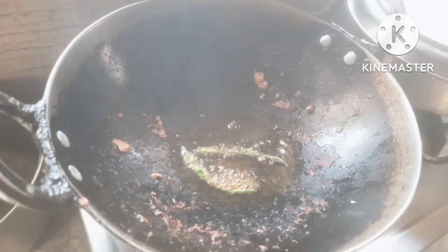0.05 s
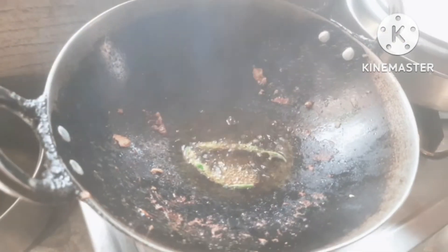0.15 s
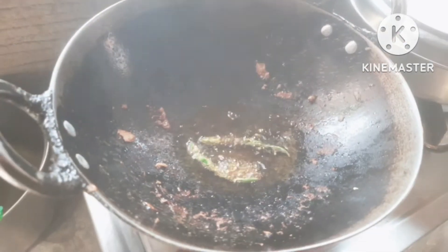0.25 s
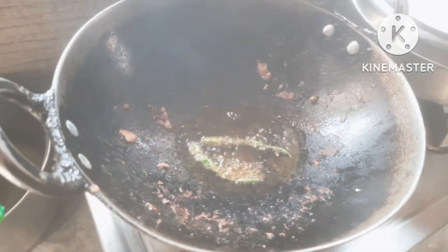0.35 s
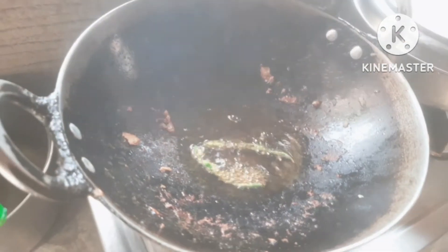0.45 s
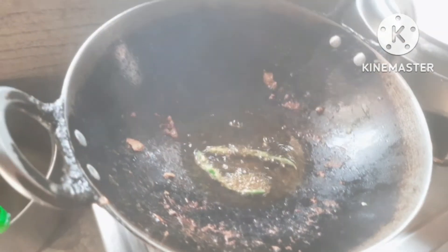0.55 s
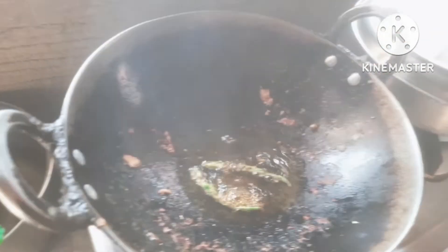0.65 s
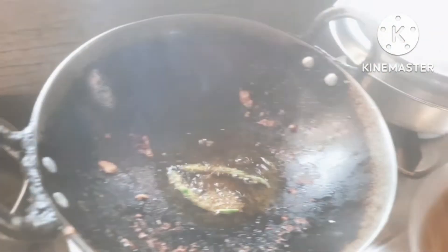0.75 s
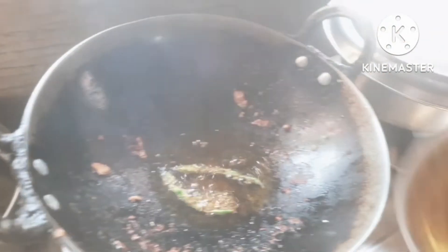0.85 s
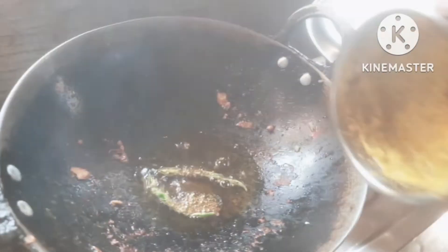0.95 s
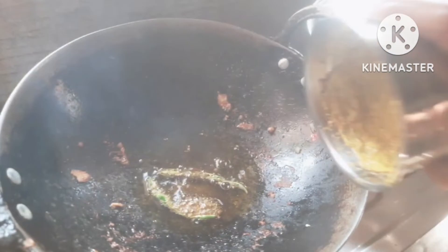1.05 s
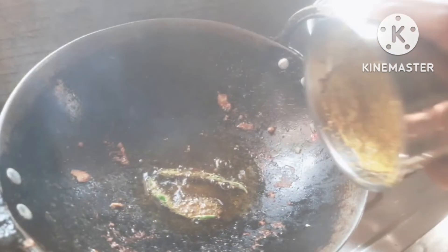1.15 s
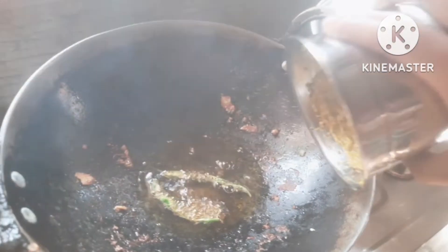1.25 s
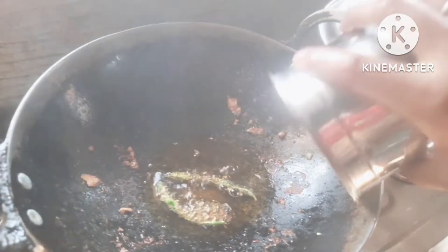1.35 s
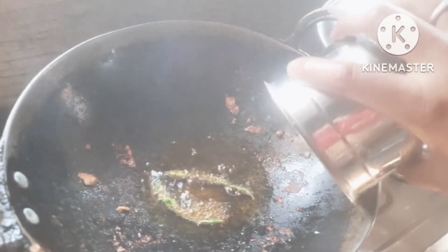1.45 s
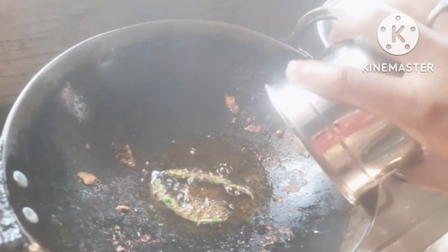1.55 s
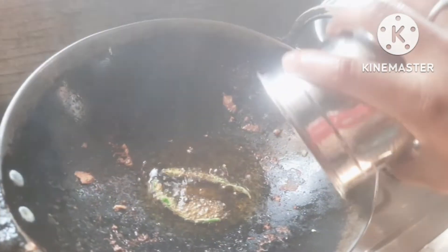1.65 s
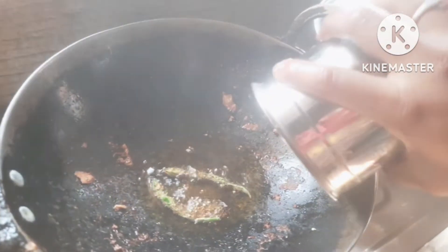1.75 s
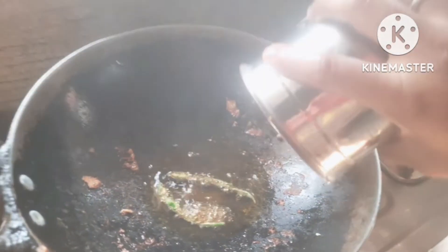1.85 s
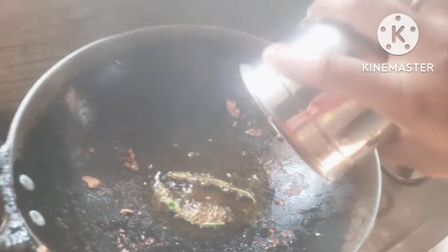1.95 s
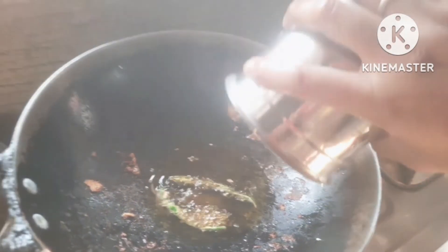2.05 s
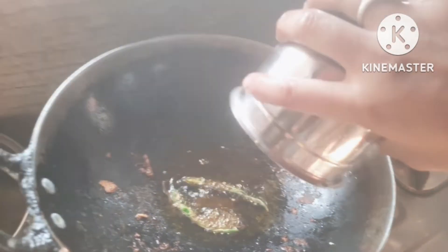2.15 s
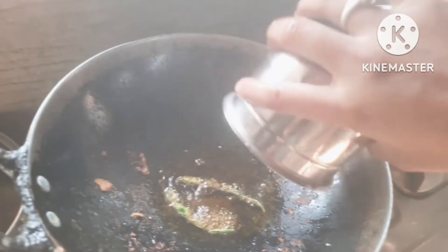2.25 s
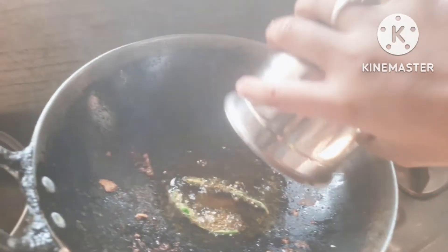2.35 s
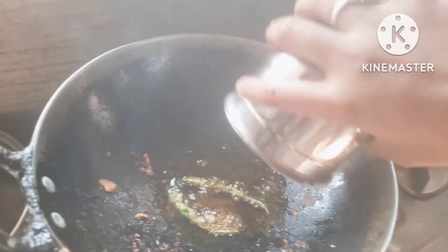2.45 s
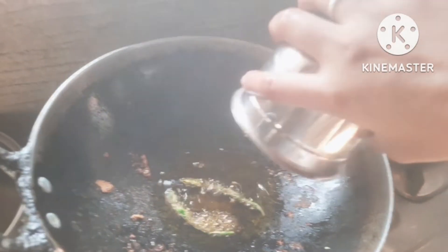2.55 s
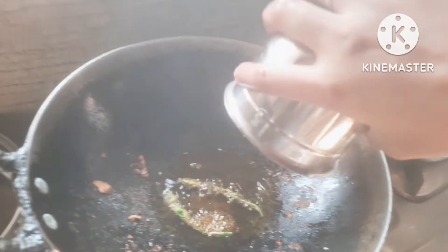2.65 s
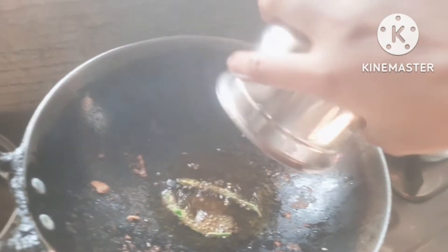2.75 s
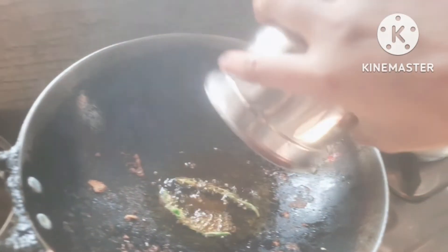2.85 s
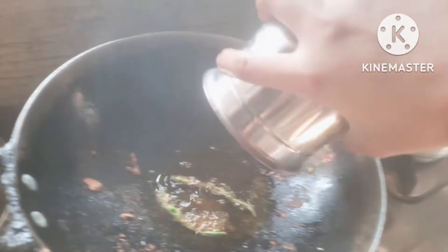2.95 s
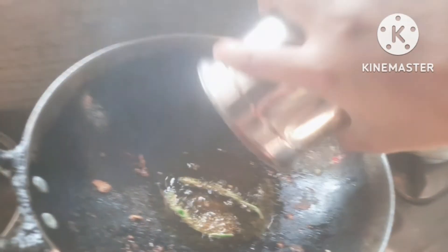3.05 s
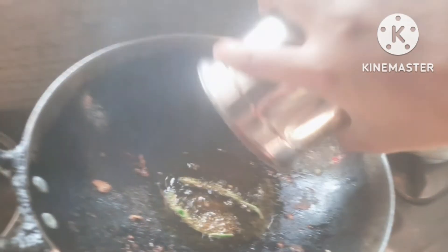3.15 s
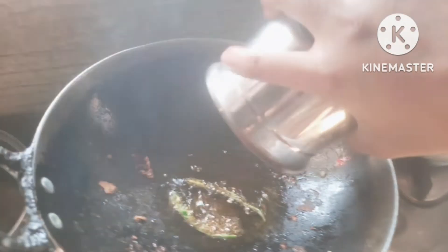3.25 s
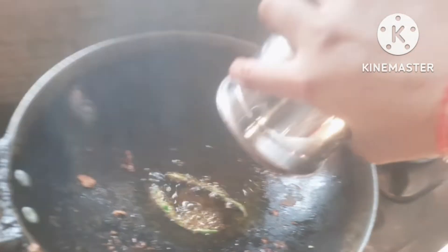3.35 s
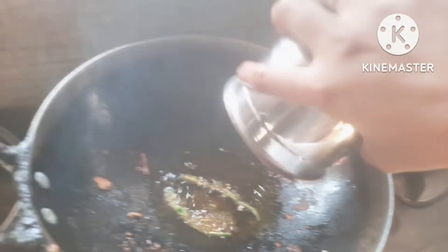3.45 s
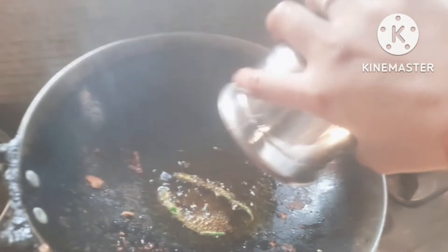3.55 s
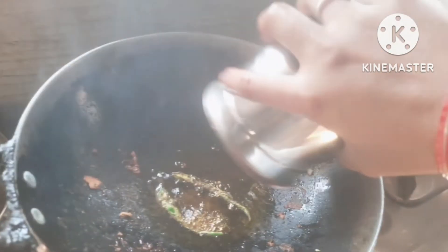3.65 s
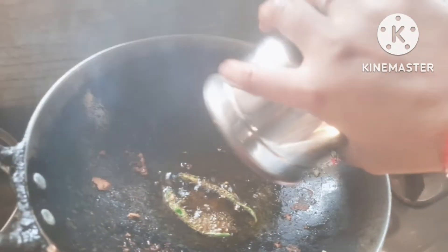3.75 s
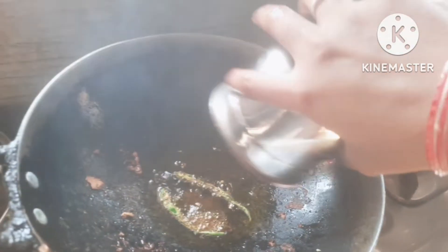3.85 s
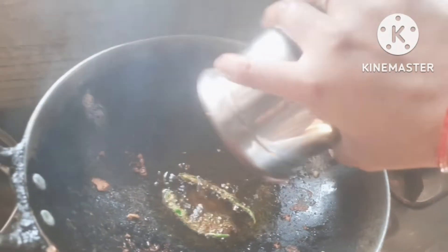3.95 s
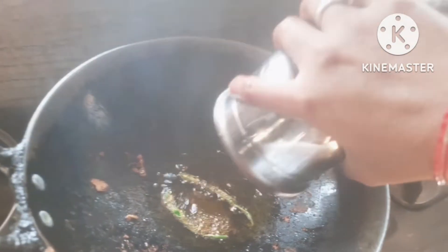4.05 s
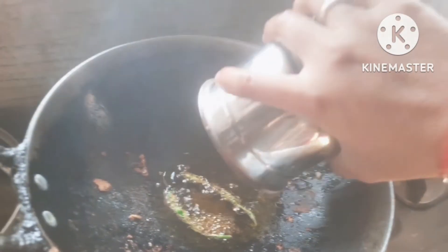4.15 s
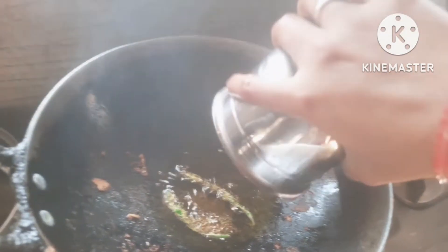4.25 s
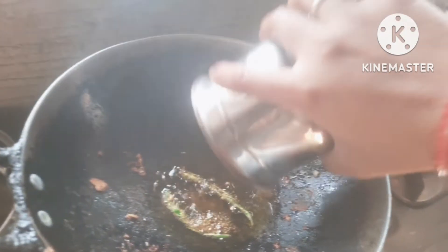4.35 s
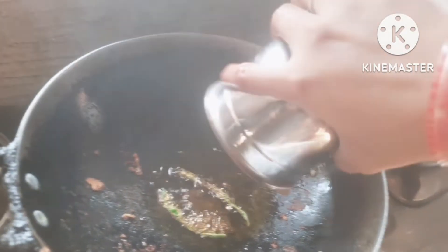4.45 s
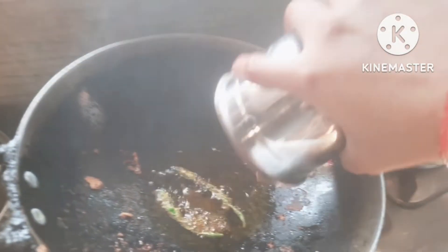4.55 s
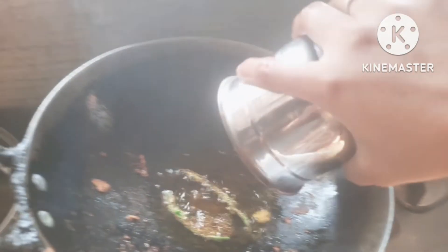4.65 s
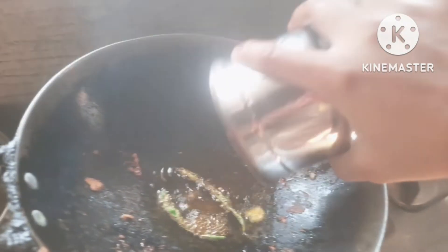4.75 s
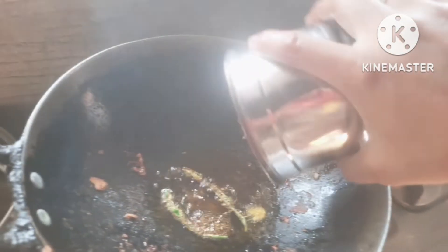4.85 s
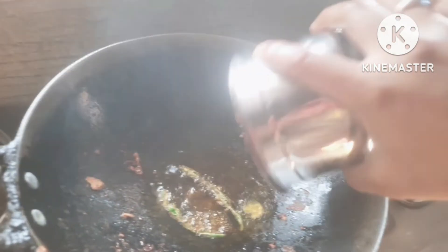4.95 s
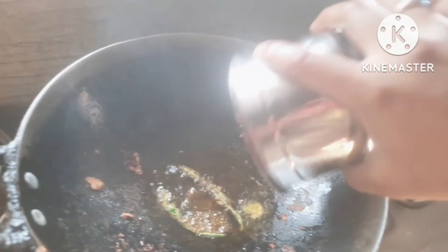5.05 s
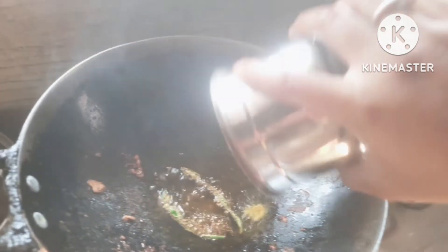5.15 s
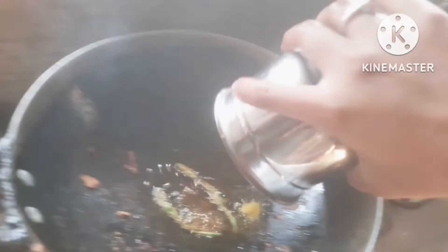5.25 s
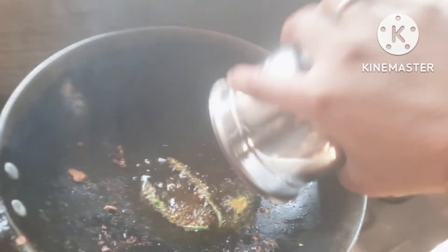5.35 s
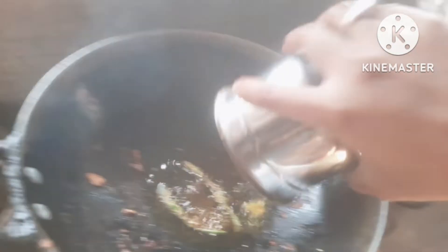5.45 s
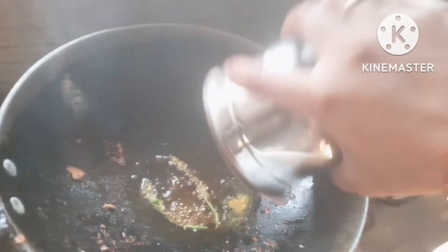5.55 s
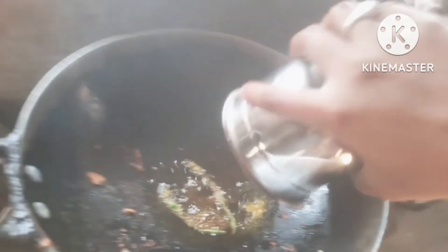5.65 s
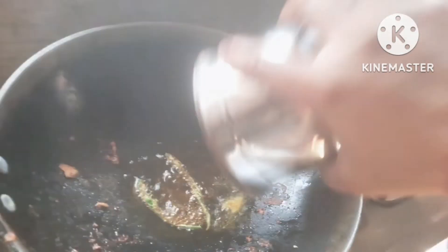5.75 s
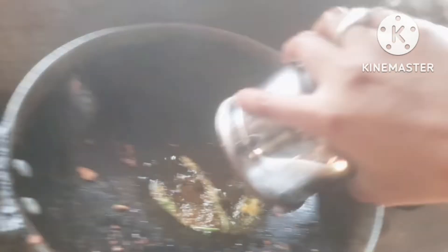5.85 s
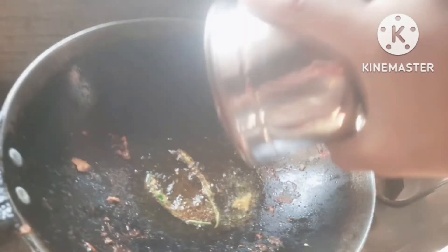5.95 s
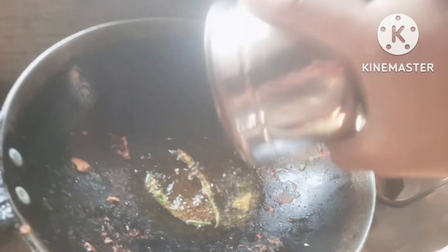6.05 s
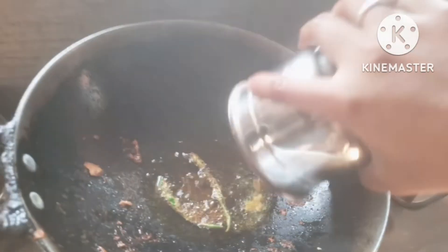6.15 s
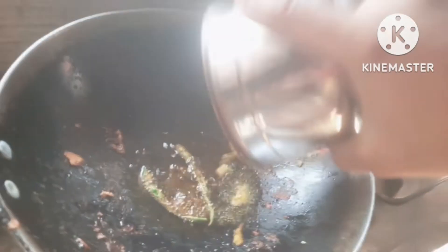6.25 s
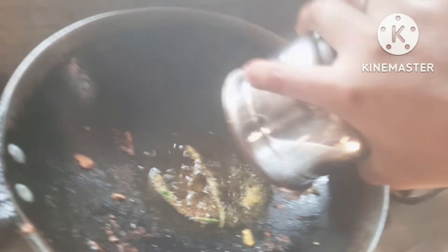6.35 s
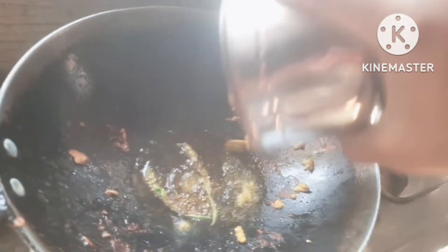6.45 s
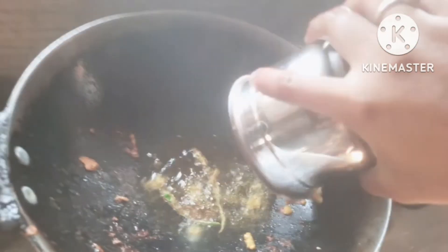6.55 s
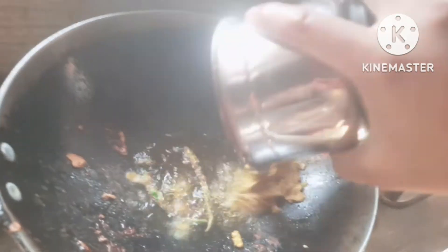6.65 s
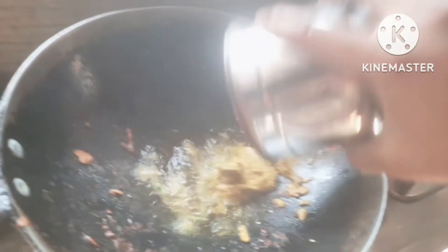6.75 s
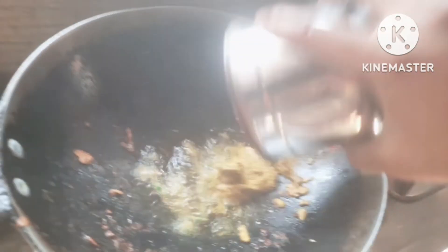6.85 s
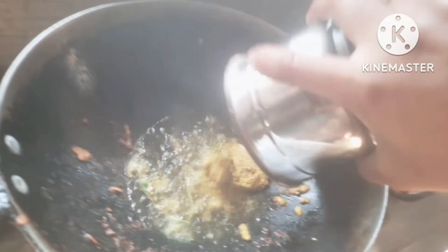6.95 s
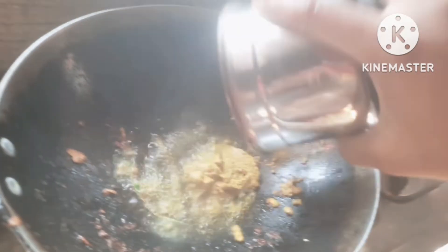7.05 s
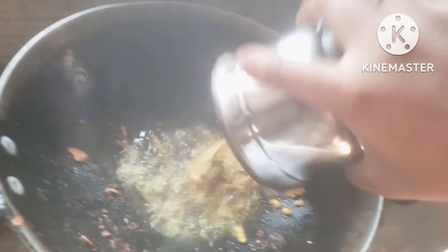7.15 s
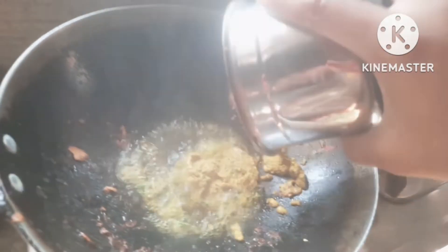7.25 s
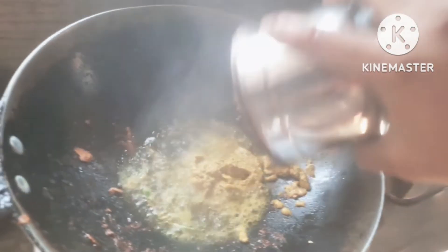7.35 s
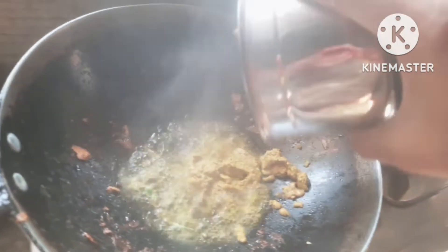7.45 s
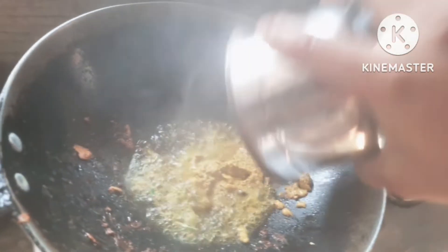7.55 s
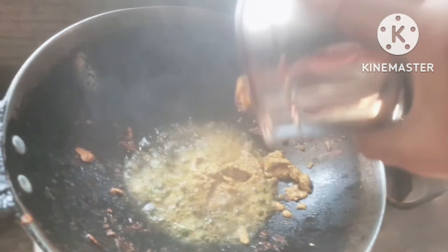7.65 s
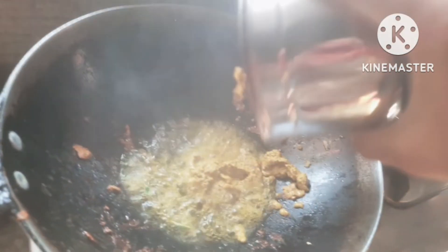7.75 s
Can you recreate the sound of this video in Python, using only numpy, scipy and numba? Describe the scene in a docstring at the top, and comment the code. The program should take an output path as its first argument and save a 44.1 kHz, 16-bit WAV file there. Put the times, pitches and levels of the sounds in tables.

```python
"""In a kitchen, close above the stove, chillies fizz quietly in hot oil in a wok: coloured hiss and tiny bursts.
A hand taps a steel tumbler (soft pressure pulses) and glass bangles clink (fading sines and ticks).
Then wet spice paste drops in: the oil spits (short ringing bubbles, oily snaps), crackles and swells to a
dense roar of steam bubbles. The phone is jolted once; wooden knocks are modes with noisy tails.
Narrow bands of noise make the faint rumble, the low air and a hollow drone behind it all."""
import sys
import numpy as np
from scipy import signal
from scipy.fft import rfft, irfft
from scipy.io import wavfile
from scipy.ndimage import uniform_filter1d
from numba import njit

SR = 44100
rng = np.random.default_rng(int(sys.argv[2]) if len(sys.argv) > 2 else 0)


def unload_audio(sound):
    """Save the sound as a 16-bit wav file, at the path given as the first command line argument."""
    columns = np.transpose(np.atleast_2d(sound))
    # keep every value between -1 and 1, then stretch to whole-number steps
    steps = np.round(np.clip(columns, -1, 1) * 32767)
    wavfile.write(sys.argv[1], SR, steps.astype(np.int16))


N = 343980
TIME = np.arange(N) / SR

# frying bed, a lump lands, then the bulk of the paste: t/s, middling bubbles level/dB, large level/dB, tiny level/dB
FRYING_LEVELS = [(0, -47.5, -55, -52.5), (1.2, -49.5, -56.5, -56.5), (1.9, -52.5, -56, -59.5),
                 (2.8, -47.5, -55.5, -56.5), (4.57, -48.5, -56.5, -55), (4.61, -31, -47, -31.5),
                 (4.8, -34, -45.5, -31), (5.5, -27, -44, -28.5), (6.2, -27, -42.5, -30),
                 (6.35, -23, -37, -28), (6.7, -22.5, -33, -22), (7.1, -23, -31.5, -26.5),
                 (7.8, -23.5, -31.5, -28.5)]
# colour of wok and microphone: f/Hz, relative level per Hz/dB
OIL_COLOUR = [(88, -49), (150, -24), (333, -27), (500, -15.5), (683, -15), (1110, -22), (1350, -18.5),
              (1770, -20), (3600, -10), (4600, 0), (5900, 2.5), (7170, 6), (7900, 4.5), (9410, -23.5),
              (10600, -23), (12800, -14.5), (15600, -18.5)]
LARGE_HZ, TINY_HZ = 4000, 9400  # large bubbles sound below the first, tiny ones above the second
# the bowl of the wok favours one band; its level at 0 dB of middling bubbles, and dB per dB of them
WOK_HZ, WOK_WIDTH_HZ = 2040, 770
WOK_DB, WOK_FOLLOWS = -30, 0.67
# crackle over hiss when large bubbles match middling ones (dB, before each band's trim);
# it gains as the large ones fall behind (dB per dB)
CRACKLE_DB, CRACKLE_GAIN = -10.5, 0.76

# single loud spits: t/s, level/dB, f/Hz
SPIT_EVENTS = [(0.1884, -19.5, 6960), (0.9433, -27, 7730), (1.538, -26, 4470), (2.021, -25, 6800),
               (2.2475, -26, 6010), (2.4255, -20.5, 4400), (3.1316, -23, 6850), (3.4241, -22, 5100),
               (3.4666, -11, 4740), (4.182, -19.5, 6660), (4.605, -13, 6540), (4.6266, -3, 6910),
               (4.653, -16, 6960), (4.6756, -8.5, 5360), (4.715, -4.5, 7600), (4.7789, -7, 7470),
               (4.8074, -13, 6980), (4.8543, -15, 6400), (4.8741, -5.5, 6500), (4.9235, -11, 7760),
               (4.9614, -9, 6500), (5.0325, -5, 7200), (5.0625, -9, 7000), (5.0927, -4.5, 7550),
               (5.1215, -7.5, 7260), (5.1513, -6, 6700), (5.2285, -7.5, 6520), (5.272, -3.5, 6100),
               (5.2993, -9, 7100), (5.326, -9, 5360), (5.376, -16, 4690), (5.3889, -11, 7300),
               (5.4073, -7, 7410), (5.4235, -5, 5500), (5.4601, -2, 7520), (5.4791, -1, 6760),
               (5.5282, -3.5, 5990), (5.5492, -2, 4940), (5.582, -3, 7000), (5.6177, -3.5, 7360),
               (5.6732, -5, 6260), (5.701, -6.5, 5200), (5.7335, -4, 6830), (5.7761, -3, 7280),
               (5.781, -4.5, 4030), (5.815, -4, 6470), (5.8717, -1, 6420), (5.9268, -3, 7050),
               (5.9647, -3.5, 5120), (5.9992, -1, 5740), (6.0863, -7, 7410), (6.1318, -2, 5560),
               (6.1567, 0, 7520), (6.1906, -7, 6360), (6.3623, -4.5, 4700), (6.8841, -3, 4540),
               (6.9424, -5, 4740), (7.1523, -9, 3520)]
# deeper bubbles: t/s, level/dB, f/Hz
PLOP_EVENTS = [(2.8877, -28.5, 1410), (4.383, -36.5, 615)]
# small spits get deeper as large bubbles catch up: large over middling level/dB, share of the pitch (ratio)
POP_SINKING = [(-16, 1), (-9, .72)]
SPIT_CYCLES, PLOP_CYCLES = 13, 12  # cycles until 60 dB down
SWELL_SHARE = 0.4  # the part subtracted for the swell fades in this share of the time
SNAP_DB, SNAP_SCATTER_DB = -6, 2  # re the spit
SPUTTER_DB, SPUTTER_S = (-11, -14, -17), 0.005  # three after-bubbles re the spit, longest wait
# small spits at random: level over middling bubbles, its spread, pitch before sinking
POPS_FROM_S, POP_DB, POP_SPREAD_DB, POP_HZ = 4.6, 5.5, 2, (4350, 7900)

# bangle clinks: t/s, first bangle level/dB, second re first level/dB, third re first level/dB
CLINK_EVENTS = [(0.7587, -33.5, -3, -13), (1.9809, -38.5, -1, -10), (2.096, -38, -4, -9),
                (2.231, -36, -6, -17), (2.2484, -39, -9, -14), (2.4468, -40, -13, -18),
                (2.5247, -33, -14, -19), (2.582, -28, -4, -13), (2.7214, -24, -8, -21),
                (2.813, -32, -7, -17), (2.85, -22, -7, -19), (2.9617, -30.5, -11, -19),
                (3.1745, -28.5, -3, -17), (3.229, -31, -4, -17), (3.3797, -39, -4, -15),
                (3.3874, -30, -10, -15), (3.487, -39, -14, -12), (3.5409, -32, -12, -17),
                (3.683, -28, -9, -18), (3.826, -28.5, -6, -8.5), (3.8394, -25.5, 1, -13),
                (3.8574, -28, -9, -15), (3.9715, -27.5, -4, -9.5), (3.989, -25, -4, -21),
                (4.0125, -36, -4, -16), (4.0736, -40, -8, -17), (4.1081, -32, -8, -16),
                (4.1502, -23.5, -9, -29), (4.2243, -29.5, -3, -15), (4.2605, -19, -10, -19),
                (4.274, -24, -2, -20), (4.3196, -21, -10, -28), (4.4071, -22, -4, -18),
                (4.4478, -26, -2, -16), (4.4717, -22.5, -9, -18), (4.5467, -42, 5, -12),
                (4.5791, -15.5, -16, -26), (5.7958, -15, -2, -16), (6.297, -18, -2, -15),
                (6.5677, -16, -7, -20)]
# modes of the three bangles, one list each: f/Hz, level/dB, t60/s
BANGLE_MODES = [
    [(14350, -3, 0.047), (14000, -28, 0.04), (4800, -22, 0.08), (4570, -30, 0.06), (12400, -41, 0.093)],
    [(15460, -6, 0.036), (15400, -10, 0.07), (15300, -1.5, 0.064), (15300, -15, .06), (5420, -13, 0.063)],
    [(9120, -8, 0.11), (8950, -6, 0.12), (10260, -3, 0.031), (10030, -5, 0.1), (10750, -1.5, 0.029)],
]
JINGLE_S, JINGLE_DB = (1.95, 4.56), -45  # faint random clinks while the hand taps: span, middle level

# dull thuds of the hand on the tumbler: t/s, level/dB
THUD_EVENTS = [(0.2114, -35), (1.2233, -38), (1.8146, -34), (1.995, -36), (2.487, -38), (2.695, -37),
               (2.8808, -35.5), (3.0586, -40.5), (3.232, -34.5), (3.4733, -30), (4.017, -32.5),
               (4.1996, -34), (4.4087, -35.5), (4.7166, -42), (5.1058, -36), (5.3727, -28), (5.584, -30.5),
               (5.6839, -34.5), (6.0285, -37), (6.4575, -35), (6.5957, -37), (6.645, -33.5), (6.821, -34.5),
               (6.996, -33.5), (7.165, -36), (7.3433, -36)]
# returns from floor and wall: delay t/s, level re the blow/dB
THUD_ECHOES = [(0.013, -6), (0.019, -7)]
BUMP_S, BUMP_DB, JOLT_S = 5.312, -14.5, 0.00014  # jolt of the phone: time, level, bell width
CRACK_DB = -3  # the case of the phone cracks

# wood set down: t/s, reference level/dB
KNOCK_EVENTS = [(1.4788, -31), (1.506, -25.5), (1.526, -31.5)]
# modes of the wood: f/Hz, level/dB, t60/s
WOOD_MODES = [(198, -7, 1.07), (366, -1.5, 0.55), (454, -0.5, 0.19), (617, 0, 0.15), (680, -12, 0.19),
              (914, 1, 0.095), (1200, 1, 0.25), (1370, 4, 0.11), (1590, -6, .1), (1825, -8, 0.087),
              (1990, -7, .1), (2270, -2, 0.04)]
SCUFF_S, SCUFF_DB, SCUFF_RISE_S, SCUFF_FALL_S = 0.139, -46.5, 0.028, 0.13  # something drags briefly

# the hollow drone comes and goes: t/s, length t/s, level/dB, pitch at the start f/Hz
DRONE_EVENTS = [(0.361, 0.78, -60, 680), (1.85, 0.24, -55, 649), (4.624, 0.057, -54, 622)]
DRONE_HZ, DRONE_DB, DRONE_FOLLOWS = 596, -32, 0.64  # level at 0 dB of large bubbles, dB per dB of them
DRONE_RISE_S, DRONE_FALL_S, DRONE_SETTLE_S, DRONE_WAVER_HZ = 0.025, 0.2, 0.4, 6
RUMBLE_DB, AIR_DB = -62.5, -66.5

TOP_HZ, CEILING = 15620, 0.86  # the phone's top edge, and the amplitude its peaks round off towards


def frying():
    """Hiss and crackle share one colour; large, middling and tiny bubbles swell each in their own way."""
    mid_db, large_db, tiny_db = curves(FRYING_LEVELS)
    crackle_db = CRACKLE_DB + CRACKLE_GAIN * (mid_db - large_db)
    colour = response(OIL_COLOUR)
    white = rng.standard_normal(N)
    bursting = crackle(count=14000, spread_db=4.5, cycles=4.5)
    hiss = rfft(signal.fftconvolve(white, colour)[:N])
    bursts = rfft(signal.fftconvolve(bursting, colour)[:N])

    hz = np.fft.rfftfreq(N, 1 / SR)
    large = 1 / (1 + (hz / LARGE_HZ) ** 8)
    tiny = 1 - 1 / (1 + (hz / TINY_HZ) ** 24)
    wok = 1 / (1 + (2 * (hz - WOK_HZ) / WOK_WIDTH_HZ) ** 2)
    bands = [  # spectral share, level in dB, crackle trim in dB
        (large, large_db, -3.0),
        (1 - large - tiny, mid_db, 0.1),
        (tiny, tiny_db, 1.1),
        (wok, WOK_DB + WOK_FOLLOWS * mid_db, -4.0)]

    out = 0
    surge = 0.65 * walk(20) + 0.57 * walk(40)  # dB, common to all bands
    for share, db, trim_db in bands:
        steady = irfft(hiss * share, N)
        mix = steady + undb(crackle_db + trim_db) * irfft(bursts * share, N)
        gain = undb(db + surge + 0.82 * walk(25)) / np.std(steady)
        # more crackle takes the place of hiss
        out = out + mix * gain / np.sqrt(1 + undb(2 * crackle_db))
    return out


def crackle(count, spread_db, cycles):
    """Steam bubbles burst at random: a few cycles each, mostly small, a few large; flat spectrum."""
    when, pitch, size, length = rng.random((count, 4)).T
    hz = 800 + 14500 * pitch
    rarest = 0.012  # bounds the largest bursts
    sign = np.sign(length - 0.5)
    gain = np.sqrt(hz) * undb(-spread_db * np.log(size + rarest)) * sign
    t60 = cycles * (0.5 + length) / hz
    return unit(ring(when * N / SR, hz, t60, gain, N, SR))


def spits():
    """A large bubble swells within a millisecond, rings a few cycles and sputters on; a snap throws oil."""
    s, db, hz = np.vstack([SPIT_EVENTS, pops(count=220)]).T
    chance = rng.random((len(s), 7)).T
    snap_db = db + SNAP_DB + SNAP_SCATTER_DB * (2 * chance[6] - 1)
    snaps = snap(s + 2 / hz, snap_db)  # two cycles into the bubble

    plop_s, plop_db, plop_hz = np.transpose(PLOP_EVENTS).copy()
    plops = ring(plop_s, plop_hz, PLOP_CYCLES / plop_hz, undb(plop_db), N, SR)

    waits = np.vstack([0 * s, SPUTTER_S * chance[:3]])
    pitches = np.vstack([hz, hz * (0.8 + 0.35 * chance[3:6])])
    # peak of swell times fade
    top = (1 - SWELL_SHARE) * SWELL_SHARE ** (SWELL_SHARE / (1 - SWELL_SHARE))
    bubbles = 0
    for wait, pitch, softer_db in zip(waits, pitches, (0, *SPUTTER_DB)):
        t60 = SPIT_CYCLES / pitch
        gain = undb(db + softer_db) / top
        fade = ring(s + wait, pitch, t60, gain, N, SR)
        onset = ring(s + wait, pitch, SWELL_SHARE * t60, gain, N, SR)
        bubbles = bubbles + fade - onset
    # the microphone is dull in one band, as in the colour of the oil
    return snaps + plops + bubbles - 0.8 * band(bubbles, 8700, 10600, order=1)


def pops(count):
    """Rows for the smaller spits once the paste is in; they follow the level of the frying."""
    when, size, pitch = rng.random((count, 3)).T
    s = np.interp(when, [0, 1], [POPS_FROM_S, TIME[-300]])
    mid_db, large_db, _ = (c[(s * SR).astype(int)] for c in curves(FRYING_LEVELS))
    sink = np.interp(large_db - mid_db, *np.transpose(POP_SINKING))
    hz = np.interp(pitch, [0, 1], POP_HZ) * sink
    db = mid_db + POP_DB - POP_SPREAD_DB * np.log(0.05 + size)
    return np.transpose([s, db, hz])


def snap(s, db):
    """Sharp clicks in the colour of wok and microphone."""
    clicks, colour = np.zeros(N), response(OIL_COLOUR)
    clicks[(np.asarray(s) * SR).astype(int)] = undb(db)
    return signal.fftconvolve(clicks, colour / np.max(np.abs(colour)))[:N]


def bangles():
    """Each clink rings the three bangles and ticks; they chatter and scrape a few more times right after."""
    s, db, second_db, third_db = np.vstack([CLINK_EVENTS, jingle(count=12)]).T
    out, ticks = 0, np.zeros(N)
    later = rng.random((len(s), 4)).T * 0.029  # s
    for modes, level_db in zip(BANGLE_MODES, (db, db + second_db, db + third_db)):
        out = out + strike(s, level_db, modes, 3.0, 0.003)
        for wait in later[:3]:
            out = out + strike(s + wait, level_db - 9, modes, 5.0, 0.004)
    for wait in np.vstack([0 * s, later]):
        # later ticks are softer, 150 dB per second
        ticks[((s + wait) * SR).astype(int)] = undb(db + third_db + 23 - 150 * wait)
    return out + band(ticks, 11000, 14000, order=1)


def jingle(count):
    """Rows for the faint clinks: time and levels by chance."""
    when, size, second, third = rng.random((count, 4)).T
    s = np.interp(when, [0, 1], JINGLE_S)
    db = JINGLE_DB + 8 * (size - 0.5)
    return np.transpose([s, db, 12 * (second - 0.7), -5 - 10 * third])


def thuds():
    """Soft blows come back from floor and wall, then boom briefly; the jolt of the phone cracks and swings out."""
    s, db = np.transpose(THUD_EVENTS)
    taps = push(s, db, 0.00061)
    for wait, echo_db in THUD_ECHOES:
        taps = taps + push(s + wait, db + echo_db, 0.0014)
    boom = decay(s + 0.0078, db - 18.5, 0.54, 27, 280)
    # a 58 Hz sine, pushed the opposite way
    swing = ring(np.array([BUMP_S + 0.00033]), np.array([58.0]), np.array([0.1]), -undb([BUMP_DB - 4]), N, SR)
    jolt = band(push([BUMP_S], [BUMP_DB], JOLT_S), 44, 6000, order=1)
    crack = snap([BUMP_S - 0.0006], [CRACK_DB])
    return band(taps, 51, 980, order=1) + boom + swing + jolt + crack


def push(s, db, width_s):
    """Soft blows: bell-shaped pressure pulses."""
    blows = np.zeros(N)
    blows[(np.asarray(s) * SR).astype(int)] = undb(db)
    t = np.arange(-300, 301) / SR
    return signal.fftconvolve(blows, np.exp(-0.5 * (t / width_s) ** 2), "same")


def knocks():
    """Wood set down on a counter: its modes, a crack and a noisy tail from the kitchen; earlier, a short drag."""
    s, db = np.transpose(KNOCK_EVENTS)
    crack = decay(s, db - 6.0, 0.023, 420, 3000)
    tail = decay(s, db - 12.5, 0.36, 370, 1500) + decay(s, db - 23.5, 0.71, 84, 640)
    drag = swell(SCUFF_S, SCUFF_RISE_S, 0, SCUFF_FALL_S) * undb(SCUFF_DB + 1.3 * walk(68))
    wood = strike(s, db - 14.0, WOOD_MODES, 1, 0.002)
    return wood + crack + tail + drag * unit(band(rng.standard_normal(N), 150, 850))


def kitchen():
    """Wavering rumble, a narrow hollow drone and faint low air between them in pitch."""
    rumble = unit(band(rng.standard_normal(N), 52, 95, order=3)) * undb(RUMBLE_DB + 3.0 * walk(6))
    large_db = curves(FRYING_LEVELS)[1]
    drone = hollow(DRONE_HZ + 0 * TIME, undb(DRONE_DB + DRONE_FOLLOWS * large_db))
    for s, length_s, db, start_hz in DRONE_EVENTS:
        gain = undb(db) * swell(s, DRONE_RISE_S, length_s, DRONE_FALL_S)
        glide = (start_hz - DRONE_HZ) * np.exp(-abs(TIME - s) / DRONE_SETTLE_S)
        drone = drone + hollow(DRONE_HZ + glide + DRONE_WAVER_HZ * walk(7.1), gain)
    air = unit(band(rng.standard_normal(N), 72, 246, order=2)) * undb(AIR_DB + 2.5 * walk(2.6))
    return rumble + drone + air


def hollow(hz, gain):
    """A narrow band of noise around a moving centre: slow complex noise turned at that pitch."""
    slow = unit(band(rng.standard_normal(N), 2, 40)) + 1j * unit(band(rng.standard_normal(N), 2, 40))
    return np.real(slow * np.exp(2j * np.pi * np.cumsum(hz) / SR)) * gain


def room(x, t60, wet_db, damp_hz):
    """A short smear of echoes: the sound plus its copy through fading noise."""
    t = np.arange(int(t60 * SR)) / SR
    noise = band(rng.standard_normal(len(t)), 57, damp_hz, order=1)
    tail = noise * undb(-60 * t / t60) * np.minimum(t / 0.009, 1)
    return x + undb(wet_db) * signal.fftconvolve(x, tail / np.sqrt(np.sum(tail ** 2)))[:N]


def strike(s, db, modes, scatter_db, drift):
    """Every blow rings all modes, each with a strength and pitch that vary a little."""
    hz, mode_db, t60 = np.transpose(modes)
    chance = rng.standard_normal((len(s), 2, len(hz)))
    gain = undb(db[:, None] + mode_db + scatter_db * chance[:, 0])
    pitch = np.minimum(hz * (1 + drift * chance[:, 1]), 0.45 * SR)
    rows = np.broadcast_arrays(s[:, None], pitch, t60, gain)
    return ring(*(r.flatten() for r in rows), N, SR)


@njit
def ring(s, hz, t60, gain, n, sr):
    """One fading sine for every row, stopped once it is 60 dB down."""
    out = np.zeros(n)
    for k in range(len(s)):
        step = np.exp((2j * np.pi * hz[k] - np.log(1000) / t60[k]) / sr)
        z = gain[k] + 0j
        start = int(s[k] * sr)
        for j in range(start, min(n, start + int(t60[k] * sr))):
            out[j] += z.imag
            z *= step
    return out


def decay(s, db, t60, lo_hz, hi_hz):
    """Noise that starts at each blow and dies away."""
    blows = np.zeros(N)
    blows[(s * SR).astype(int)] = undb(db)
    fading = signal.lfilter([1], [1, -undb(-60 / (t60 * SR))], blows)
    return fading * unit(band(rng.standard_normal(N), lo_hz, hi_hz))


def swell(s, rise_s, hold_s, fall_s):
    """Gain that rises, holds and falls."""
    return np.interp(TIME - s, np.cumsum([0, rise_s, hold_s, fall_s]), [0, 1, 1, 0]) ** 2


def response(points, size=1024):
    """Causal impulse response with the colour of (Hz, dB) points, from the folded cepstrum."""
    hz, db = np.transpose(points)
    bins = np.log(np.fft.rfftfreq(size, 1 / SR) + 1)
    cepstrum = irfft(np.log(undb(np.interp(bins, np.log(hz), db))))
    cepstrum[1:size // 2] *= 2
    cepstrum[size // 2 + 1:] = 0
    return irfft(np.exp(rfft(cepstrum)))


def walk(rate):
    """Random levels, a new one every 1 / rate s with straight slews between; spread a little over 1."""
    k = int(SR / rate)
    held = np.repeat(rng.standard_normal(N // k + 1), k)
    return 1.48 * uniform_filter1d(held, k)[:N]


def curves(table):
    """The columns of a table, sample by sample."""
    s, *columns = np.transpose(table)
    return [np.interp(TIME, s, c) for c in columns]


def band(x, lo_hz, hi_hz, order=2):
    """Band-pass."""
    return signal.sosfilt(signal.butter(order, [lo_hz, hi_hz], "band", fs=SR, output="sos"), x)


def unit(x):
    """Scale to rms 1."""
    return x / np.sqrt(np.mean(x ** 2))


def undb(db):
    """dB to gain."""
    return 10 ** (np.asarray(db) / 20)


def scene():
    """All sources; wok and stove add a very short tail to spits and glass."""
    near = room(spits() + bangles(), t60=0.07, wet_db=-9, damp_hz=15000)
    return (frying() + near + thuds() + knocks() + kitchen())[None]


def record(dry):
    """The phone drops the deepest bass, rounds the loudest peaks and cuts the top."""
    near = signal.sosfilt(signal.butter(4, 40, "high", fs=SR, output="sos"), dry)
    rounded = CEILING * np.tanh(near / CEILING)
    return signal.sosfilt(signal.ellip(12, 0.2, 85, TOP_HZ, fs=SR, output="sos"), rounded)


dry = scene()
out = record(dry)
unload_audio(out)
```